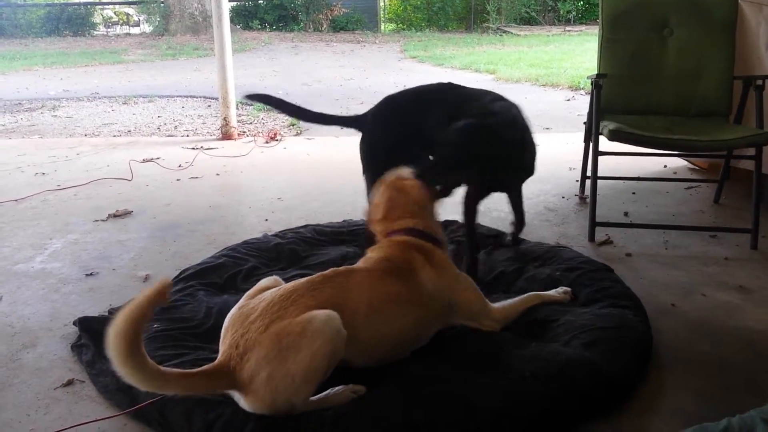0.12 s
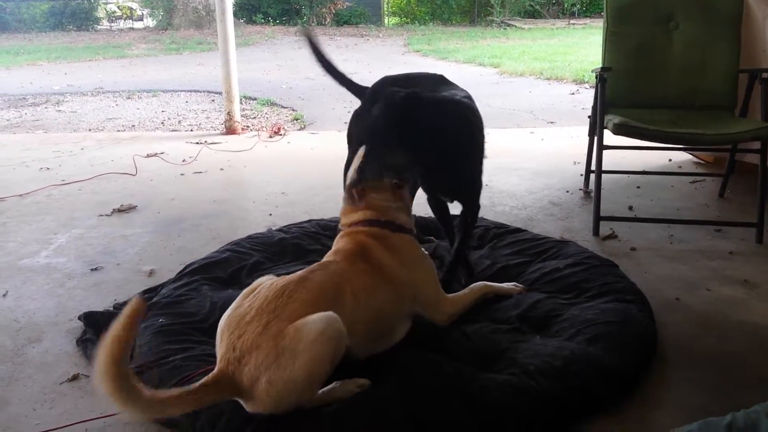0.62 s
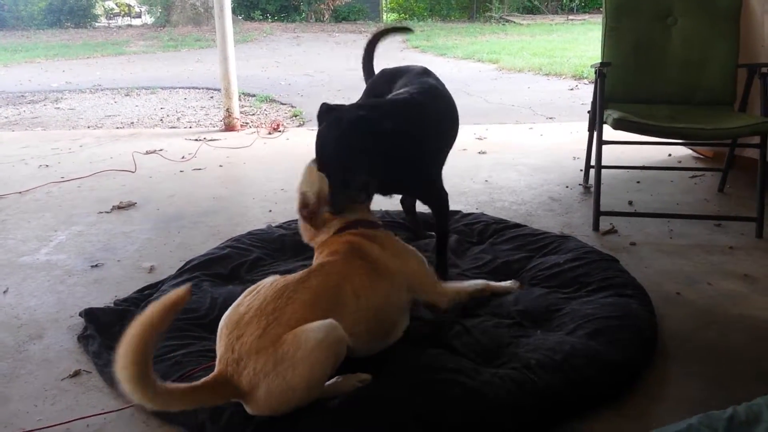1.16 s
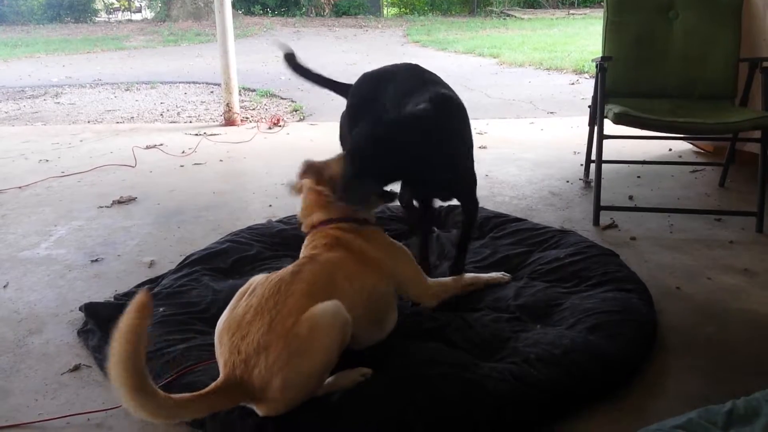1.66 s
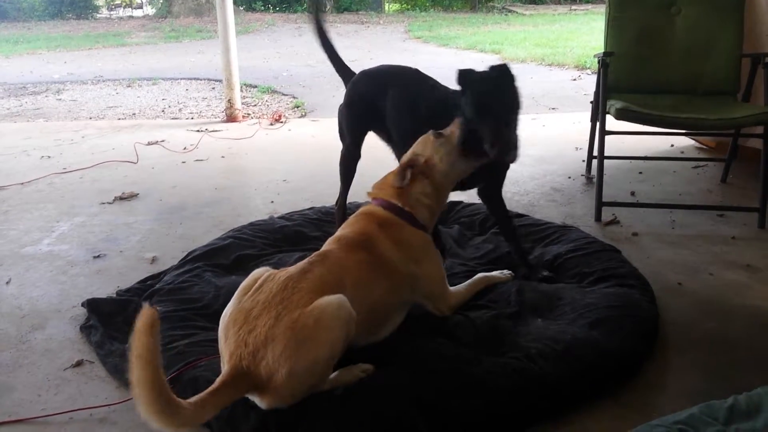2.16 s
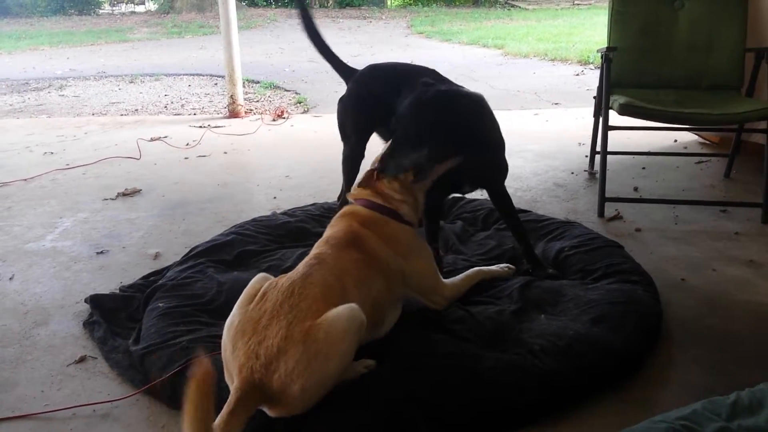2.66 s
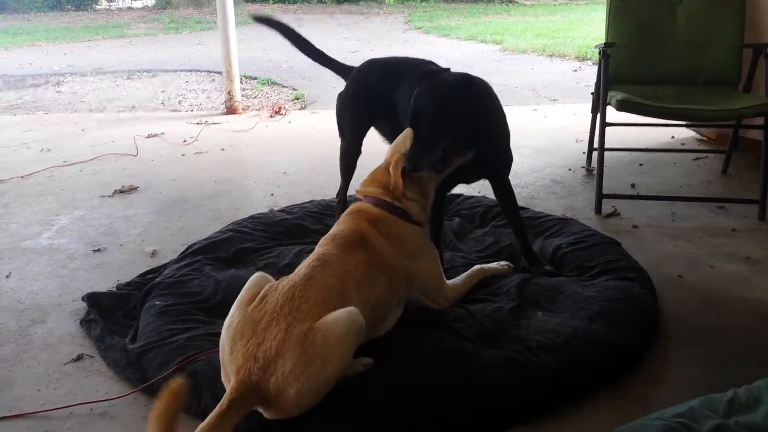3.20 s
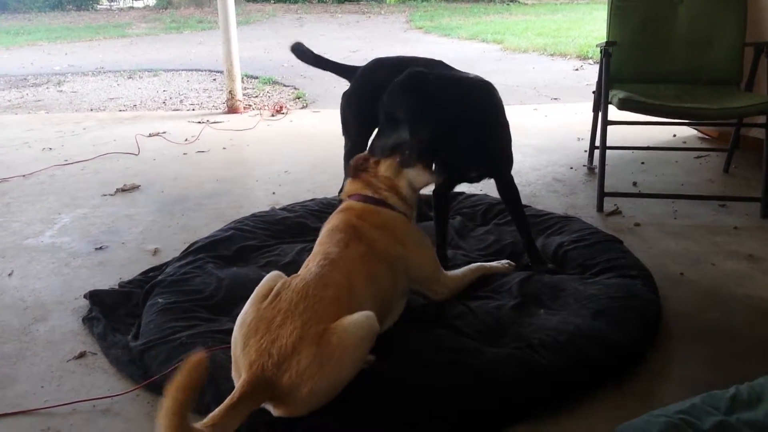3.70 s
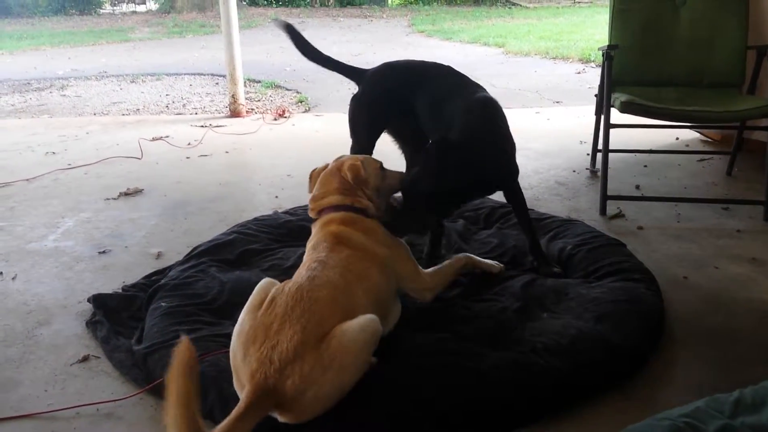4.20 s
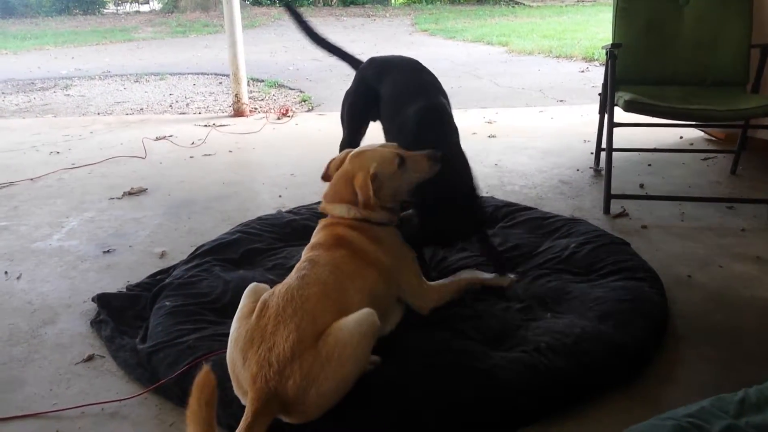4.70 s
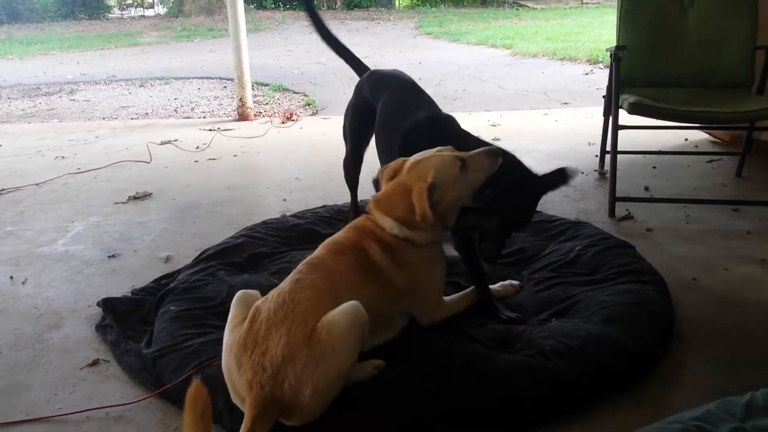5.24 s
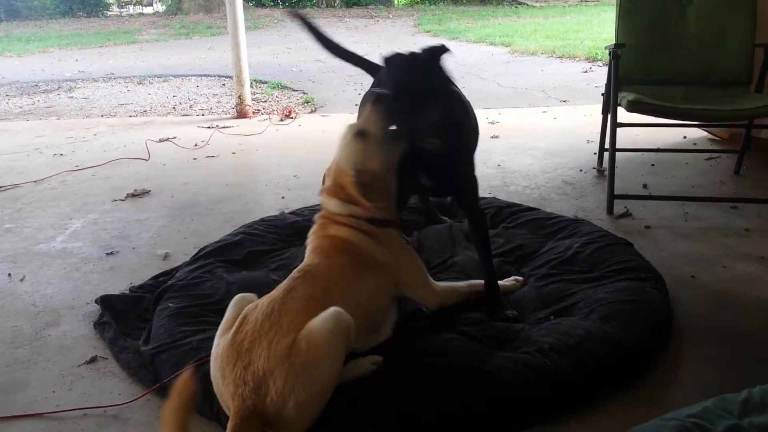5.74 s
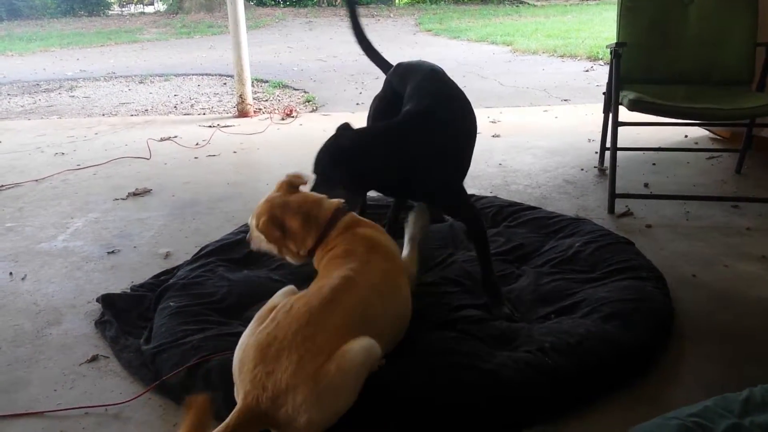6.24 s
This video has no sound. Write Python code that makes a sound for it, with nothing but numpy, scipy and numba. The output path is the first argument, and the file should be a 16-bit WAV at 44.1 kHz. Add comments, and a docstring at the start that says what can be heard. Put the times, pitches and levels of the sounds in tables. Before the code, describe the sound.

Two dogs wrestle under an echoing porch: low grumbling, snorting pants, jingling collar tags, two sharp growl-barks, teeth clacks and short moans.

```python
"""Distant traffic and insects (coloured noise) lie under the whole scene: two dogs wrestling on a cushion under
a porch roof, a few metres from a phone. From the start one grumbles and pants (uneven pulses and air through
resonances) and its collar tags jingle (ringing modes). The other (harmonics through an opening mouth) growls up
into a bark, moans, then, after fur rubs and teeth clack in flurries, barks again and ends on a moan.
Concrete and roof echo both dogs, and loud sound turns the phone's gain down for a while."""
import sys
import numpy as np
from scipy import signal
from scipy.fft import rfft, irfft, next_fast_len
from scipy.io import wavfile
from scipy.ndimage import uniform_filter1d
from numba import njit

SR = 44100
rng = np.random.default_rng(int(sys.argv[2]) if len(sys.argv) > 2 else 0)


def log_audio(samples):
    """Write samples as a 16-bit WAV file to the path given in sys.argv[1]."""
    # one column per channel
    frames = np.atleast_2d(samples).T
    # limit to full scale, then quantise
    limited = np.clip(frames, -1, 1)
    pcm = np.round(limited * 32767).astype(np.int16)
    wavfile.write(sys.argv[1], SR, pcm)


def to_linear_factor(level_db):
    """Convert decibel levels (scalar or array-like) to linear amplitude factors."""
    exponent = np.asarray(level_db, float) / 20
    return 10 ** exponent


N = 280899
T = np.arange(N) / SR

# Far beds, spectrum: f/Hz, density/dB per Hz (relative)
TRAFFIC = [(15, -25), (25, -15), (38, -19.5), (82, -6), (146, -5), (205, -4.5), (374, -11.5), (485, -18.5),
           (709, -12), (1550, -22.5), (3000, -24), (3900, -70), (6600, -120)]
INSECTS = [(1760, -26), (3000, -6), (3350, -5.5), (4200, -2), (5570, -0.5), (6340, 4.5), (7000, 0),
           (7910, 2), (9390, -15), (9860, -17.5), (11800, -30), (13000, -33)]
TRAFFIC_DB, INSECTS_DB = -44, -44

# Fur and cloth rubbing: t/s, level/dB
RUBS = [(.23, -51), (.45, -52), (2.33, -47), (2.433, -35), (2.6, -42), (4.0, -50), (4.504, -30.5),
        (4.665, -38.5), (5.2, -51), (5.61, -50)]
RUB_ATTACK_S, RUB_FADE_DB_PER_S, RUB_REST_DB = 0.013, 306, -62.5

# Knocks of the collar tags: t/s, round tag level/dB, thin tag level/dB, broad tick level/dB
JINGLES = [(0.2394, -57, -84, -55), (0.2987, -64, -70, -56), (0.3311, -52, -93, -49),
           (1.4344, -40, -41, -42), (1.468, -52, -37, -23), (1.5971, -41, -63, -31),
           (1.6292, -45, -74, -45), (1.943, -58, -114, -48), (2.085, -58, -60, -32), (2.247, -44, -54, -34),
           (2.33, -69, -66, -46), (2.3356, -54, -62, -28), (2.432, -48, -58, -26.5), (2.527, -41, -65, -38),
           (2.5635, -61, -85, -34), (2.662, -39.5, -73, -35), (3.748, -64, -80, -42),
           (4.2797, -67, -69, -40.5), (4.4784, -58, -65, -33), (4.5085, -41, -53, -24),
           (4.525, -34.5, -40, -37), (4.6663, -63, -67, -34), (4.728, -66, -77, -32),
           (4.993, -62, -68, -38), (6.2339, -69, -83, -40.5)]
# Ringing modes of the round and the thin tag: f/Hz, level/dB, t60/s
ROUND_TAG = [(9300, 0, 0.061), (10500, -4, 0.04), (11900, 3, 0.043), (12130, 3.5, 0.022),
             (13000, -6, 0.082)]
THIN_TAG = [(5950, -6, 0.091), (13950, 8, 0.1), (14000, -3, 0.13)]

# Teeth meeting: t/s, level/dB, ring f/Hz
CLACKS = [(2.432, -17.5, 6100), (4.405, -22.5, 5200), (4.477, -33, 1240), (4.5, -25, 1180),
          (4.508, -18, 1260), (4.527, -26, 920), (4.547, -18.5, 1040), (4.869, -30, 1240),
          (4.999, -23.5, 1010), (6.347, -20, 906)]

# Grumbling dog, resonances of chest and open jaw: f/Hz, width/Hz, level/dB
GRUMBLER_CHEST = [(122.3, 28, 8), (199.3, 42, 5.5), (308, 33, -6)]
GRUMBLER_JAW = [(1440, 810, 14), (2023, 170, 12.5)]
# Effort of the rattle in its chest, before its sway: t/s, level/dB
CHEST_EFFORT = [(0, -45), (.3, -48), (1.0, -45), (2.2, -50.5), (2.45, -40.5), (3.0, -43.5), (3.55, -47),
                (3.75, -53), (4.1, -48), (5.0, -46.5), (6.37, -43.5)]
# Its pants and snorts: t/s, hold/s, level/dB, mouth resonance f/Hz, open jaw against mouth level/dB
PANTS = [(0.149, 0.059, -44.5, 930, 0), (0.442, .04, -44.5, 955, -10), (0.813, 0.023, -53, 950, -23),
         (2.355, 0.08, -58, 800, 6.5), (2.426, 0.078, -46, 650, -14), (2.636, .05, -51, 800, -30),
         (3.045, .3, -54, 730, -24), (3.52, 0.032, -56, 760, -4), (3.971, 0.12, -44, 990, 2.5),
         (4.148, 0.077, -47, 985, 1), (4.344, 0.021, -52, 770, -5), (4.506, 0.036, -52, 1050, 5.5),
         (4.68, 0.039, -63, 800, 8), (4.891, 0.011, -39, 1000, -3), (5.02, 0.1, -48.5, 1050, -9),
         (6.29, .04, -43.5, 870, -6), (6.342, 0.027, -39, 877, -3)]
PANT_ATTACK_S, PANT_FADE_DB_PER_S = 0.032, 300
RATTLE_HZ, RATTLE_JITTER = 67.78, 0.41  # centre rate; random spread in natural-log units
RATTLE_BREATH_DB, PANT_BREATH_DB = 6.5, 21  # air against flaps: in the chest, in mouth and jaw
CHEST_SWAY_DB, MOUTH_SWAY_DB = 2.5, 2
MOUTH_REST_DB, MOUTH_REST_HZ, JAW_REST_DB = -65.5, 800, -80

# Barking dog, one curve a call: two growls rise into barks that crest and fall, two moans stay low.
# t/s, pitch f/Hz, level/dB, mouth opening level/dB
BARKER_CALLS = [
    [(1.035, 164.7, -35.5, -12), (1.11, 186.2, -34.5, 0), (1.165, 244, -25, 4.5), (1.195, 340, -13.5, 19),
     (1.222, 525, -22.5, -4), (1.24, 594.4, -10, 6.5), (1.272, 635.2, -8.5, 2), (1.298, 639.2, -12.5, -16),
     (1.318, 578.8, -11.5, -36), (1.349, 342, -23, 6), (1.383, 241, -26, -9), (1.437, 155.8, -41, -34),
     (1.5, 136, -51.5, -22)],
    [(2.5, 110, -52, -13), (2.6, 117.8, -43, -12), (2.76, 121.1, -48, 0), (2.8, 139, -40.5, -19),
     (2.93, 141.3, -54, -14)],
    [(5.27, 148.2, -49.5, -7), (5.33, 150.1, -43, -4), (5.39, 167, -36.5, -16), (5.43, 174.2, -35.5, -16),
     (5.61, 181.8, -34.5, -13), (5.745, 177.4, -32, -9), (5.778, 230.2, -29.5, 6),
     (5.793, 336, -16.5, 13.5), (5.813, 484.4, -23, 2), (5.84, 584, -9.5, 3.5), (5.865, 617.5, -7.5, 5),
     (5.892, 620.7, -10, -16), (5.912, 576.2, -6, -16), (5.93, 506, -26, -9)],
    [(6.03, 134.5, -35, -28), (6.09, 143, -31, -33), (6.23, 136.6, -39.5, -29), (6.33, 135, -42, -20)],
]
# Air against voice, one entry a call: level/dB
CALL_BREATH_DB = [-10, -25, -13.5, -22]
# Resonances of its chest, mouth and jaw: f/Hz, width/Hz, level/dB
BARKER_CHEST = [(273, 280, 0.03)]
BARKER_MOUTH = [(655, 154, 10.7)]
BARKER_JAW = [(1065, 830, 8.2), (1814, 590, 18.3), (2392, 263, 19.9), (3863, 450, 10.5), (4810, 180, 12),
              (5670, 1350, 4.8), (7680, 1800, 5.3), (9320, 1230, 4.6)]
# Air whistling past the teeth as the jaws fly open: t/s, level/dB
RASPS = [(1.189, -28), (5.785, -34)]
RASP_FROM_HZ, RASP_TO_HZ, RASP_GLIDE_S = 6610, 4900, 0.021
RASP_ATTACK_S, RASP_HOLD_S, RASP_FADE_DB_PER_S = 0.023, 0.043, 450
FOLD_SLOPE_DB = -5  # per octave
WANDER_HZ, SHIMMER_DB = 6, 2.2  # random drift of pitch and level
# from TIGHT_HZ up the folds close ever more fully, and the air dies away over the span
TIGHT_HZ, TIGHT_SPAN_HZ, TIGHT_DB = 220, 300, -27
# slack folds beat strong-weak, adding lines halfway between the harmonics below this pitch
HALF_DB, HALF_FADE_HZ = -5, 230
# the jaw opens with the pitch, and shuts late
JAW_SHUT_HZ, JAW_SHUT_DB, JAW_WIDE_DB, JAW_DB_PER_OCTAVE, JAW_LINGER_S = 189, -34, -3, 35, 0.052

# Porch: delay-line lengths in samples, decay, dulling per round, level of the late echoes
PORCH_LAGS = np.array([457, 683, 953, 1249, 1601, 1949, 2311, 2749])
PORCH_T60_S, PORCH_DAMP, PORCH_DB = 0.51, 0.012, -4
EARLY_S = 0.025  # fade of the first echoes off floor, wall and roof
NEAR_ECHO_DB = -4  # the nearer dog sounds drier

# Microphone ports, tone balance: f/Hz, left minus right level/dB
PORT_COLOUR = [(60, -0.5), (110, 0.0), (200, 1.5), (370, 1.0), (690, 1.5), (1270, 0.0), (2340, -2.0),
               (4300, 4.0), (7920, -0.5), (14600, -8.5)]
TOP_HZ = 14850
BARKER_LAG_S, GRUMBLER_LAG_S = 0.000483, 0.00005  # how much later the left port hears each dog

# Gain control: threshold, dB of cut per dB above it, speed down, speed of the quick return,
# share of the cut that is kept, how long it is kept, and how slowly it then comes back
GAIN_TOP_DB, GAIN_RATIO, GAIN_ATTACK_S, GAIN_QUICK_S = -26.5, 0.47, 0.068, 0.041
GAIN_KEPT, GAIN_HOLD_S, GAIN_BACK_S = 0.93, 0.78, 0.65


def level(x, db):
    """Scale to an rms level."""
    return x * to_linear_factor(db) / np.sqrt(np.mean(x ** 2))


def colour(x, gain, lag_s=0.):
    """Filter by a gain over frequency and delay."""
    size = next_fast_len(N + 4096)
    hz = np.arange(size // 2 + 1) * SR / size
    spectrum = rfft(x, size) * gain(hz + 1) * np.exp(-2j * np.pi * hz * lag_s)
    return irfft(spectrum, size)[..., :N]


def walk(rate):
    """Smooth random drift: levels held 1 / rate s and slewed twice, spread somewhat under 1."""
    hold = max(int(SR / rate), 1)
    steps = np.repeat(rng.standard_normal(N // hold + 1), hold)
    return 1.1 * uniform_filter1d(uniform_filter1d(steps, hold), hold)[:N]


def swell(s, attack_s, hold_s, fade_db_per_s):
    """Gain of an event: rises until s, holds, then fades."""
    rise = np.clip(1 + (T - s) / attack_s, 0, 1) ** 2
    return rise * to_linear_factor(-fade_db_per_s * np.maximum(T - s - hold_s, 0))


@njit
def svf(x, hz, width):
    """State-variable band-pass whose centre may move; gain 1 at the centre."""
    y, band, low = np.empty(len(x)), 0., 0.
    for i in range(len(x)):
        g, k = np.tan(np.pi * hz[i] / SR), width / hz[i]
        v = (band + g * (x[i] - low)) / (1 + g * (g + k))
        band, low, y[i] = 2 * v - band, low + 2 * g * v, k * v
    return y


def ring(x, hz, width):
    """A fixed resonance."""
    return svf(x, np.full(N, float(hz)), float(width))


def tract(hz, peaks):
    """Gain of steep resonances with dark valleys between."""
    return np.sqrt(sum((to_linear_factor(db) / (1 + (2 * (hz - f) / w) ** 2)) ** 2 for f, w, db in peaks))


def spread(x, alike_hz):
    """Two signals as mid and side: the ports hear much the same well below alike_hz and differ above."""
    side = colour(x[1], lambda f: np.clip(f / alike_hz, .1, 1))
    return x[0] + side * np.array([[1], [-1]])


def hiss(spectrum, db, sway_db):
    """Steady far noise of a given colour that swells a little."""
    hz, gain_db = np.transpose(spectrum)
    white = rng.standard_normal((2, N))
    noise = colour(white, lambda f: to_linear_factor(np.interp(np.log(f), np.log(hz), gain_db)))
    return level(spread(noise, 1300), db) * to_linear_factor(sway_db * walk(2.535))


def outdoors():
    """Many far sources blur into noise: traffic below, insects above."""
    return hiss(TRAFFIC, TRAFFIC_DB, 0.21) + hiss(INSECTS, INSECTS_DB, 0.33)


@njit
def walls(x, lags, gain, damp):
    """Eight delay lines that feed each other, duller on every round."""
    line, soft, out = np.zeros((8, 4096)), np.zeros(8), np.zeros((2, len(x)))
    for i in range(len(x)):
        total = 0.
        for k in range(8):
            soft[k] += (1 - damp) * (gain[k] * line[k, (i - lags[k]) & 4095] - soft[k])
            total += soft[k]
            out[k % 2, i] += soft[k] * (1 - (k & 2))
        for k in range(8):
            line[k, i & 4095] = x[i] + 1e-18 + soft[k] - total / 4
    return out / 2


def first_echoes(sent):
    """Sparse random reflections off floor, wall and roof, with equal energy at each port."""
    t = np.arange(2000) / SR
    hits = rng.random((2, len(t))) < .02
    echoes = rng.standard_normal((2, len(t))) * hits * np.exp(-t / EARLY_S) * (t > .002)
    echoes /= np.linalg.norm(echoes, axis=1, keepdims=True)
    return signal.fftconvolve(sent[None], echoes, axes=1)[:, :N]


def rustle():
    """Dense small grains of fur on fur and cloth."""
    rubs = sum(to_linear_factor(db) * swell(s, RUB_ATTACK_S, 0, RUB_FADE_DB_PER_S) for s, db in RUBS)
    grains = rng.standard_normal(N) * to_linear_factor(12.6 * walk(400))
    return (to_linear_factor(RUB_REST_DB) + rubs) * level(ring(ring(grains, 6760, 3800), 6540, 3000), 0)


def tags():
    """Each knock of the metal tags ticks and rings the same modes in a new mix."""
    out, t = np.zeros(N + SR), np.arange(SR // 2) / SR
    tick = level(ring(ring(rng.standard_normal(N), 7900, 4100), 6200, 4900), 0)
    mixes = rng.standard_normal((len(JINGLES), len(ROUND_TAG + THIN_TAG)))
    for (s, round_db, thin_db, tick_db), mix in zip(JINGLES, mixes):
        i = int(s * SR)
        modes = [(f, db + round_db, t60) for f, db, t60 in ROUND_TAG]
        modes += [(f, db + thin_db, t60) for f, db, t60 in THIN_TAG]
        for (f, db, t60), m in zip(modes, mix):
            tone = np.sin(2 * np.pi * f * (1 + 0.0012 * m) * t)  # each knock detunes a mode slightly
            out[i:i + len(t)] += to_linear_factor(db + 0.93 * m) * tone * 1000. ** (-t / t60)
        out[i:i + len(t)] += to_linear_factor(tick_db) * np.exp(-t / 0.0026) * tick[i // 2:i // 2 + len(t)]
    return out[:N]


def teeth():
    """A short crack and a quickly damped ring of the jaw."""
    out, t = np.zeros(N + SR), np.arange(SR // 20) / SR
    for s, db, hz in CLACKS:
        i = int(s * SR)
        jaw = np.sin(2 * np.pi * hz * t) * np.exp(-t / 0.0014)
        crack = 0.56 * rng.standard_normal(len(t)) * np.exp(-t / 0.00096)
        out[i:i + len(t)] += to_linear_factor(db) * (jaw + crack)
    return colour(out[:N], lambda f: 1 / (1 + (f / 9000) ** 4))


def grumbler():
    """Slack folds rattle unevenly; flaps ring the chest, and the air they pass hisses in mouth and open jaw."""
    rest = to_linear_factor(MOUTH_REST_DB + MOUTH_SWAY_DB * walk(9))
    pants = [to_linear_factor(db) * swell(s, PANT_ATTACK_S, hold, PANT_FADE_DB_PER_S) for s, hold, db, _, _ in PANTS]
    mouth_gain = rest + sum(pants)
    # the mouth resonance leans towards whichever pant is loudest
    mouth_hz = (rest * MOUTH_REST_HZ + sum(g * p[3] for g, p in zip(pants, PANTS))) / mouth_gain
    jaw_gain = to_linear_factor(JAW_REST_DB) + sum(g * to_linear_factor(p[4]) for g, p in zip(pants, PANTS))

    turns = np.cumsum(RATTLE_HZ * np.exp(RATTLE_JITTER * walk(50))) / SR
    flaps = level(np.diff(np.floor(turns), prepend=0) * to_linear_factor(5 * walk(70)), 0)  # one click a turn
    puffs = np.exp(-(turns % 1) / 0.6) * rng.standard_normal(N)

    rattle = flaps + level(puffs, RATTLE_BREATH_DB)
    chest = sum(to_linear_factor(db) * ring(rattle, f, w) for f, w, db in GRUMBLER_CHEST)
    pant = flaps + level(puffs, PANT_BREATH_DB)
    mouth = svf(svf(pant, mouth_hz, 390.0), mouth_hz, 390.0)
    jaw = sum(to_linear_factor(db) * ring(ring(pant, f, w), f, 2 * w) for f, w, db in GRUMBLER_JAW)

    chest_db = np.interp(T, *np.transpose(CHEST_EFFORT)) + CHEST_SWAY_DB * walk(8.6)
    return level(chest, 0) * to_linear_factor(chest_db) + mouth_gain * level(mouth, 0) + jaw_gain * level(jaw, 0)


def rasps(air):
    """Air whistles past the teeth: noise through a narrow band that glides down."""
    out = np.zeros(N)
    for s, db in RASPS:
        hz = np.interp(T, [s, s + RASP_GLIDE_S], [RASP_FROM_HZ, RASP_TO_HZ])
        whistle = level(svf(svf(air, hz, 860.0), hz, 860.0), 0)
        out += to_linear_factor(db) * swell(s, RASP_ATTACK_S, RASP_HOLD_S, RASP_FADE_DB_PER_S) * whistle
    return out


def fold_slope(hz):
    """Vocal folds weaken steadily towards the treble."""
    return to_linear_factor(FOLD_SLOPE_DB * np.log2(hz / 600))


def barker():
    """Folds give harmonics and a puff of air a cycle; opening mouth and jaw frees the higher resonances."""
    out = np.zeros(N)
    parts = BARKER_CHEST, BARKER_MOUTH, BARKER_JAW
    wobble, shimmer = WANDER_HZ * walk(110), SHIMMER_DB * walk(70)
    air = rng.standard_normal(N)
    # turbulence has little bass
    airs = [colour(air, lambda hz: tract(hz, p) * fold_slope(hz + 300) / (1 + (550 / hz) ** 6))
            for p in parts]
    order = np.arange(2, 81)[:, None] / 2  # harmonics and the lines halfway between
    for call, air_db in zip(BARKER_CALLS, CALL_BREATH_DB):
        s, *curves = np.transpose(call)
        on = np.clip(np.minimum(T - s[0], s[-1] - T) / 0.014 + 1, 0, 1)
        span = on > 0
        hz, db, mouth_db = (np.interp(T[span], s, c) for c in curves)

        effort_hz = np.maximum(hz, np.interp(T[span] - JAW_LINGER_S, s, curves[0]))
        jaw_db = JAW_SHUT_DB + JAW_DB_PER_OCTAVE * np.log2(effort_hz / JAW_SHUT_HZ)
        opening = 1, to_linear_factor(mouth_db), to_linear_factor(np.clip(jaw_db, JAW_SHUT_DB, JAW_WIDE_DB))
        tight = np.clip((hz - TIGHT_HZ) / TIGHT_SPAN_HZ, 0, 1)
        turns = np.cumsum(hz + wobble[span] * (1 - tight / 2)) / SR  # slack folds wander more

        half_gain = to_linear_factor(HALF_DB + air_db - max(CALL_BREATH_DB)) * (hz < HALF_FADE_HZ) * (order > 3)
        halves = np.where(order % 1, half_gain, 1)
        line_hz = order * hz
        resonance = np.sqrt(sum((o * tract(line_hz, p)) ** 2 for o, p in zip(opening, parts)))
        gains = resonance * fold_slope(line_hz) * (line_hz < .4 * SR) * halves
        voice = np.sum(gains * np.sin(2 * np.pi * order * turns), axis=0)
        voice /= np.sqrt(np.sum(gains ** 2, axis=0) / 2)  # the level curve alone sets loudness

        breath = sum(o * a[span] for o, a in zip(opening, airs))
        breath /= np.sqrt(sum(o ** 2 * np.var(a) for o, a in zip(opening, airs)))
        puffs = (1 + .5 * np.cos(2 * np.pi * turns)) * breath
        sound = voice + to_linear_factor(air_db + TIGHT_DB * tight) * puffs
        out[span] += on[span] * to_linear_factor(db + shimmer[span]) * sound
    return out + rasps(air)


def scene():
    """Both dogs reach the ports directly and by way of floor and roof."""
    far, near = barker(), grumbler() + teeth() + rustle() + tags()
    sent = far + to_linear_factor(NEAR_ECHO_DB) * near
    late = walls(sent, PORCH_LAGS, to_linear_factor(-60 * PORCH_LAGS / SR / PORCH_T60_S), PORCH_DAMP)
    left = colour(far, np.ones_like, BARKER_LAG_S) + colour(near, np.ones_like, GRUMBLER_LAG_S)
    direct = np.array([left, far + near])
    return direct + spread(to_linear_factor(PORCH_DB) * late + first_echoes(sent), 1030) + outdoors()


def gain_control(x, size=220):
    """Loud sound cuts the gain fast; most of the cut is kept for a while before the gain comes back."""
    power = uniform_filter1d(np.mean(x ** 2, axis=0), 4 * size)[::size]
    wanted = GAIN_RATIO * np.maximum(10 * np.log10(power + 1e-12) - GAIN_TOP_DB, 0)
    step, cut, kept, since, cuts = size / SR, 0., 0., 0., []
    for w in wanted:
        cut += (w - cut) * min(step / (GAIN_ATTACK_S if w > cut else GAIN_QUICK_S), 1)
        since = 0. if GAIN_KEPT * cut >= kept else since + step
        release = np.clip((since - GAIN_HOLD_S) / 0.11 + .5, .03, 1)  # barely leaks during the hold
        kept = max(GAIN_KEPT * cut, kept * (1 - step / GAIN_BACK_S * release))
        cuts.append(max(cut, kept))
    return x * to_linear_factor(-np.interp(np.arange(N), np.arange(len(cuts)) * size, cuts))


def low_pass(x):
    """Removes everything above the highest recorded frequency."""
    return signal.sosfilt(signal.butter(12, 15180, fs=SR, output="sos"), x)


def record(dry):
    """The two ports colour the sound differently; then gain control and rounded peaks."""
    hz, db = np.transpose(PORT_COLOUR)
    ports = []
    for channel, sign in zip(dry, (1, -1)):
        def port_gain(f):
            """Half the left-right difference, up at one port and down at the other; nothing above the top."""
            return to_linear_factor(sign * np.interp(np.log(f), np.log(hz), db) / 2) * (f < TOP_HZ)
        ports.append(colour(channel, port_gain))
    mix = np.tanh(0.74 * gain_control(np.array(ports))) / 0.65
    return low_pass(mix)


dry = scene()
out = record(dry)
log_audio(out)
```